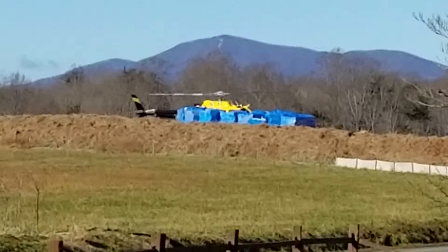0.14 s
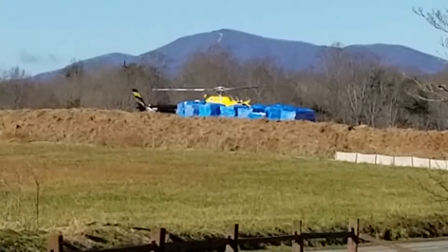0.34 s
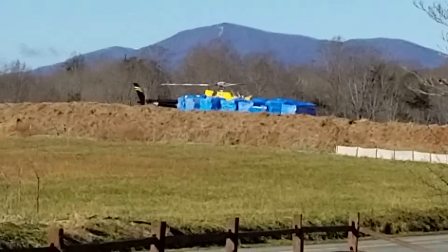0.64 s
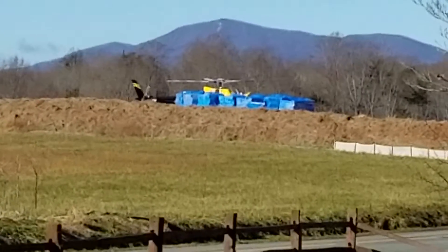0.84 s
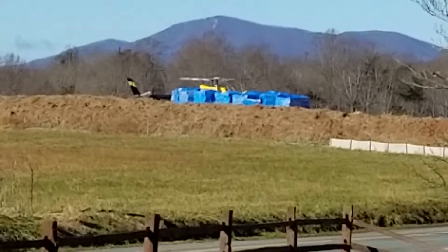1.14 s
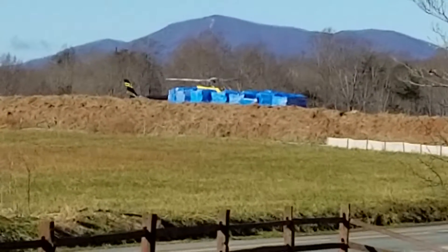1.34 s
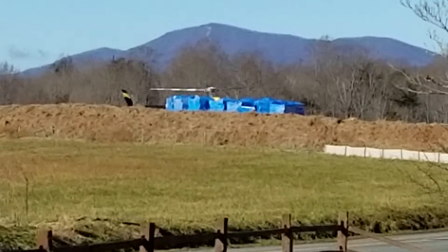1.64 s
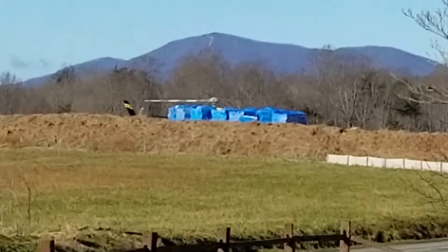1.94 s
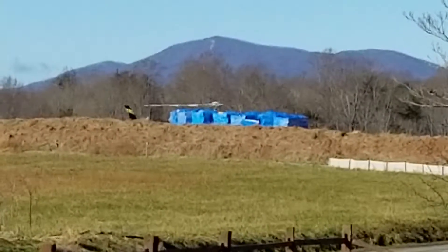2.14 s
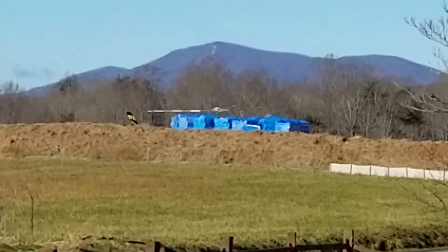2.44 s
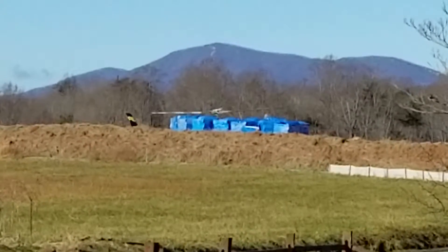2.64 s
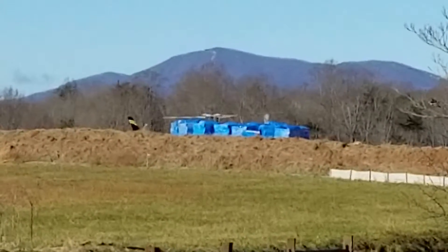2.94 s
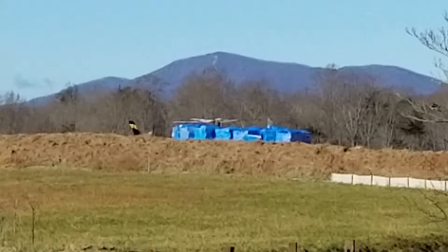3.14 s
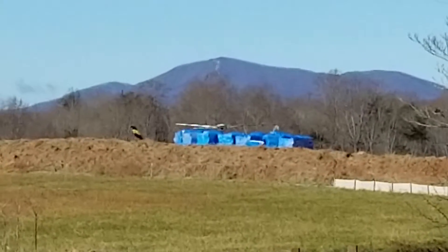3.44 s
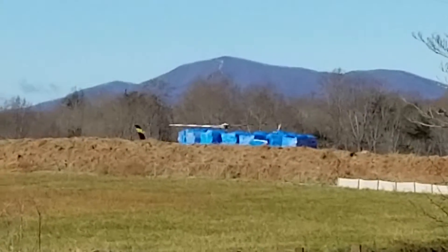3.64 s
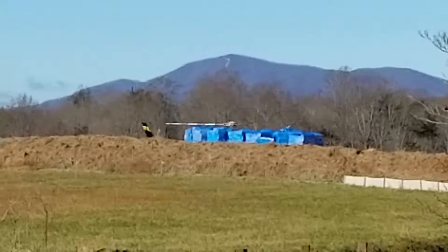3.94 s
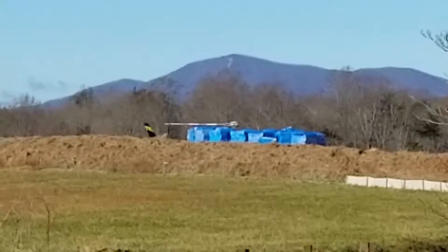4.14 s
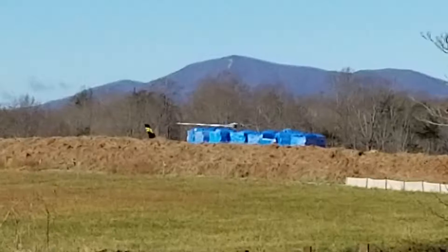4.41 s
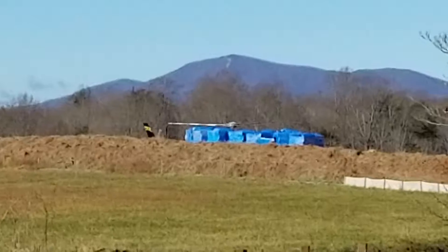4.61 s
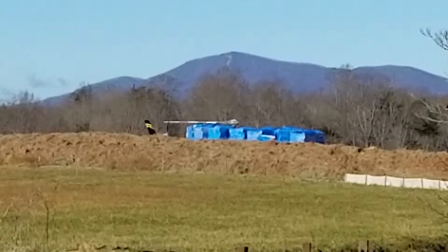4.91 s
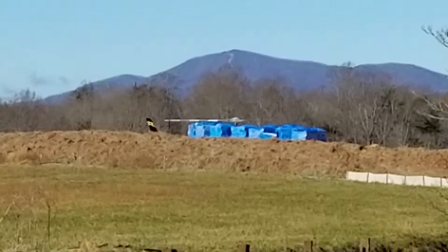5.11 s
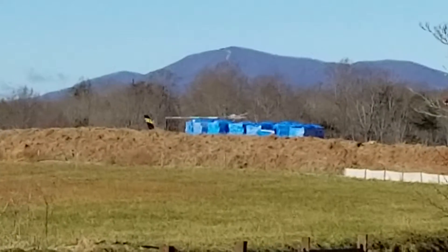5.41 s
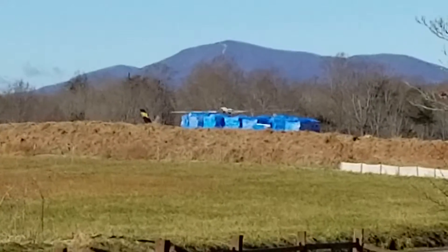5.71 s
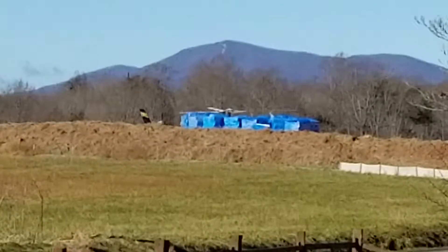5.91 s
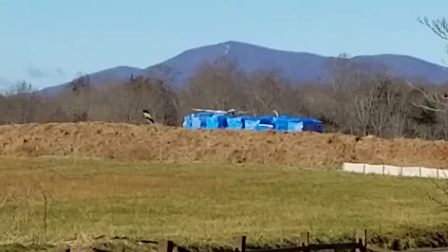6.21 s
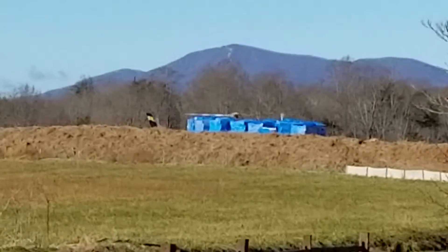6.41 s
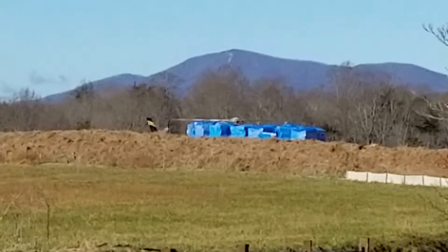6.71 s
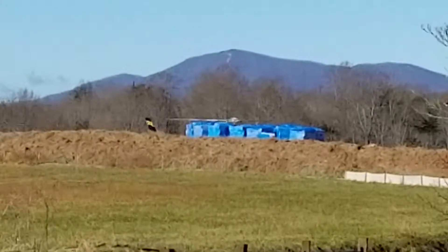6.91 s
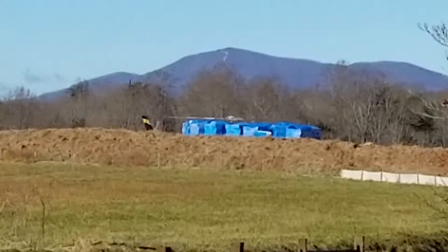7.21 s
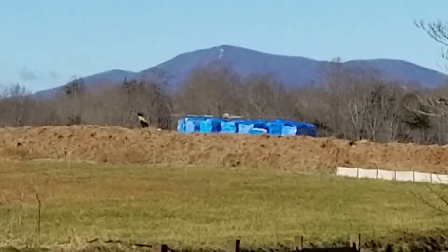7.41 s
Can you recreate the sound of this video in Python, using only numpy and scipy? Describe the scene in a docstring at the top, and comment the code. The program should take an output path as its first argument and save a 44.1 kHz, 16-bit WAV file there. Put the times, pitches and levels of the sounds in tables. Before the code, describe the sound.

Outdoors across a grassy field, a light helicopter behind an earth bank beats about nineteen times a second, with grainy slaps, swishing blades, a muffled turbine roar and faint tail rotor hum. Nearer and louder, gusty wind buffets the phone microphone in low thuds and fluttering rumbles, nearly continuous early, easing around five seconds, then surging again.

```python
"""Gusty wind buffets a phone microphone, a little more on the left: band-passed noise under a breeze and short gusts.
Far across a field, behind an earth bank, a light three-blade helicopter beats through it.
Each blade slaps up to three tip vortices, as short grainy noise puffs, and swishes as it swings round.
Turbine roar (flickering noise bands), rotor thump and tail rotor hum (wavering sines) lie under the slaps."""
import sys
import numpy as np
from scipy import signal
from scipy.fft import rfft, irfft
from scipy.io import wavfile
from scipy.ndimage import uniform_filter1d

SR = 44100
rng = np.random.default_rng(int(sys.argv[2]) if len(sys.argv) > 2 else 0)


def output_pcm(signal):
    """Save a mono or channel-first signal as 16-bit PCM at the path in sys.argv[1].

    Samples are clipped to [-1, 1] before scaling.
    """
    pcm = np.clip(np.atleast_2d(signal).T, -1, 1) * 32767
    wavfile.write(sys.argv[1], SR, np.round(pcm).astype(np.int16))


N = 333396
BLADE_HZ = 19.45  # blade passes per second
SIDES = np.array([[1], [-1]])  # left, right


def undb(db):
    """Gain of a level in dB."""
    return 10 ** (np.asarray(db) / 20)


def unit(x):
    """Scaled to rms 1."""
    return x / np.sqrt(np.mean(x ** 2))


def curves(table):
    """Columns of a table, interpolated to one value per sample."""
    s, *columns = np.transpose(table)
    return [np.interp(np.arange(N) / SR, s, c) for c in columns]


def butter(x, hz, kind, order):
    """Fixed high-, low- or band-pass."""
    return signal.sosfilt(signal.butter(order, hz, kind, fs=SR, output="sos"), x)


def walk(rate_per_s):
    """Random levels held 1 / rate s and slewed twice; rms 1."""
    hold = int(SR / rate_per_s)
    steps = np.repeat(rng.standard_normal(N // hold + 1), hold)
    slewed = uniform_filter1d(uniform_filter1d(steps, hold), hold)
    return unit(slewed[:N])


# Breeze between gusts. Each row: time [s], mean buffet level [dB], thud level below about 100 Hz without gusts [dB].
BREEZE = [(0, -25.5, -26.5), (.45, -22.5, -28.5), (.85, -28, -25), (1.3, -19, -26), (1.9, -25, -24),
          (2.2, -32.5, -29), (2.55, -14.5, -23.5), (2.75, -22.5, -23.5), (3.2, -18.5, -25), (3.7, -28, -27),
          (4.0, -20.5, -23), (4.5, -26.5, -29.5), (4.75, -26, -25), (5.1, -31.5, -31.5), (5.4, -24.5, -25),
          (5.6, -31.5, -26.5), (6.35, -14, -17.5), (6.6, -23, -29), (6.78, -13.5, -23.5), (6.84, -28, -34),
          (7.0, -21, -25), (7.3, -28, -28.5), (7.56, -31, -30.5)]
# Gusts added in power. Each row: middle [s], peak [dB], width at 1/e power [ms], rasp minus peak [dB].
GUSTS = [(0.173, -18.5, 106, -8.5), (0.28, -13.5, 46, -8), (0.353, -14.5, 45, -11.5),
         (0.562, -12, 71, -11.5), (0.786, -19.5, 35, -9), (0.993, -18.5, 36, -17.3),
         (1.102, -22.5, 114, -7.2), (1.237, -15, 62, -11.4), (1.327, -17, 79, -8), (1.476, -14, 32, -8),
         (1.527, -14, 19, -12.0), (1.647, -14, 38, -17), (1.726, -11, 24, -7), (1.808, -18.4, 26, -8.5),
         (1.855, -13.5, 36, -13), (2.514, -18.5, 38, -10), (2.637, -8.5, 19, -10.0), (2.823, -16.5, 42, -7),
         (2.917, -14.6, 54, -7.5), (3.1, -15.5, 30, -10), (3.158, -21, 15, -17.4), (3.287, -12.5, 38, -10),
         (3.366, -13.5, 110, -11), (3.495, -10, 64, -6), (3.627, -20, 45, -17), (3.789, -16, 22, -24),
         (3.88, -19, 78, -7.5), (4.05, -15, 120, -7.5), (4.128, -12.5, 29, -10), (4.306, -16, 44, -9.5),
         (4.685, -21, 62, -6.5), (5.698, -17, 34, -20), (5.891, -21, 28, -23), (6.033, -11.5, 30, -12.5),
         (6.149, -14.5, 24, -9), (6.249, -13.5, 68, -12), (6.317, -11, 26, -13.5), (6.374, -12, 24, -7),
         (6.717, -10, 65, -10), (6.891, -14.5, 63, -8), (6.952, -13, 58, -5), (7.086, -16.5, 48, -10.9)]


def gusts(breeze_rasp_db=-9.5, rasp_growth_db_per_db=0.15, middling_wind_db=-20.5,
          wander_db=1.8, wander_per_s=30, thud_follows=0.45):
    """Gains of thud, buffet and rasp: wandering breeze plus a bell-shaped swell per gust; thud takes a share."""
    ms = np.arange(int(N / SR * 1000) + 2)
    middle_s, peak_db, length_ms, gust_rasp_db = np.transpose(GUSTS)[:, :, None]
    swell_power = undb(peak_db) ** 2 * np.exp(-(2 * (ms - 1000 * middle_s) / length_ms) ** 2)

    def summed(power):
        """Total power of all gusts, from 1 ms steps to samples."""
        return np.interp(np.arange(N) / SR * 1000, ms, power.sum(axis=0))

    breeze_db, thud_db = curves(BREEZE)
    breeze_power = undb(breeze_db + wander_db * walk(wander_per_s)) ** 2
    buffet = np.sqrt(breeze_power + summed(swell_power))
    # rasp grows faster than the breeze
    rasp_db = breeze_rasp_db + rasp_growth_db_per_db * (breeze_db - middling_wind_db)
    rasp_power = breeze_power * undb(rasp_db) ** 2 + summed(swell_power * undb(gust_rasp_db) ** 2)
    thud = undb(thud_db) * (buffet / undb(breeze_db)) ** thud_follows
    return thud, buffet, np.sqrt(rasp_power)


def wind(left_db=0.65, apart_db=-26, flutter_db=2.5, flutter_per_s=55):
    """Eddies thump on the port: thud, low fluttering buffet, and a rasp that shares the flutter."""
    thud_gain, buffet_gain, rasp_gain = gusts()
    pressures = []
    for _ in range(2):  # shared pressure, then the small part that differs between the sides
        flutter = flutter_db * walk(flutter_per_s)
        air = rng.standard_normal((3, N))
        thud = butter(butter(air[0], 110, "low", order=3), 60, "high", order=3)
        buffet = butter(butter(air[1], 229.4, "low", order=4), 84.8, "high", order=3)
        rasp = butter(air[2], 250, "low", order=2)
        rasp = butter(butter(rasp, 1100, "low", order=3), 290, "high", order=3)
        pressures.append(thud_gain * unit(thud)
                         + buffet_gain * unit(buffet * undb(flutter))
                         + rasp_gain * unit(rasp * undb(0.81 * flutter)))
    shared, apart = pressures
    return undb(left_db * SIDES) * shared + undb(apart_db) * SIDES * apart


# Third beat of the main rotor, tail blades, their octave. Each row: frequency [Hz], level before waver [dB rms].
HUM = [(58.4, -40.5), (69.3, -42), (138.6, -32.5)]


def hum(waver_db=2, waver_rad=.8):
    """Steady rotor tones, wavering in level and phase with the air they cross."""
    t = np.arange(N) / SR
    total = 0
    for hz, db in HUM:
        tone = np.sin(2 * np.pi * hz * t + waver_rad * walk(4))
        total = total + undb(db) * np.sqrt(2) * undb(waver_db * walk(5)) * tone
    return total


# Colour after bank and field, notched by the ground bounce. Each row: frequency [Hz], relative density [dB per Hz].
PATH = [(210, -45.5), (440, -10.5), (620, 0), (800, -8), (950, 0.5), (1090, -4), (1290, -18.5), (1750, -10),
        (2150, -10.5), (2350, -21.5), (2950, -31.5), (4050, -27), (5700, -43.5), (7300, -43), (9000, -62.5)]


def over_field(x):
    """Minimum-phase filter with the colour of the path, built by folding the cepstrum."""
    hz, db = np.transpose(PATH)
    log_hz = np.log(np.arange(1025) * SR / 2048 + 1)
    log_gain = np.interp(log_hz, np.log(hz), db) * np.log(10) / 20
    cepstrum = irfft(log_gain)
    cepstrum[1:1024] *= 2
    cepstrum[1025:] = 0
    impulse = irfft(np.exp(rfft(cepstrum)))
    return signal.fftconvolve(x, impulse)[:N]


# Broad hiss of the advancing blade. Each row: time [s], loudest moment after the blade mark [ms].
SWISH = [(0, 34.6), (2, 26), (4, 15), (6, 3), (7.56, 1.3)]
# Turbine and rotor wash. Each row: time [s], roar before trim [dB], treble minus roar [dB],
# filling of the ground notches near 1.4 kHz [dB] and near 2.7 kHz [dB].
ROAR = [(0, -32.5, -13.5, 7.5, 4), (.6, -26, -16.5, 7.5, 5), (1.1, -29, -16, 5.5, 4.5),
        (1.5, -30.5, -15.5, 4.5, 3.5), (2, -31, -16, 0.5, 4.5), (2.6, -28.5, -15.5, 7, 3.5),
        (3.5, -27, -16.5, 6, 2.5), (3.9, -31, -14, 4, 6.5), (4.3, -30, -16.5, -0.5, 0.5),
        (5, -31.5, -16, 2, -0.5), (6, -27.5, -15, 2, 1), (6.8, -31.5, -18, 1.5, 5.5),
        (7.56, -32.5, -14.5, -5.5, 1.5)]


def wash(swish_db=2.0, bright_swish_db=2.5, top_swish_db=1.0, split_hz=3000, flicker_db=1.25, trim_db=-2.5):
    """Turbulent roar in half-octave bands that flicker and swell once for every blade."""
    roar_db, treble_db = curves(ROAR)[:2]
    turn = BLADE_HZ * (np.arange(N) / SR - curves(SWISH)[0] / 1000)
    swell = np.cos(2 * np.pi * turn) * (1 + 0.47 * walk(3.4))
    edges_hz = 250 * 2 ** np.arange(0, 5.5, .5)
    bands = 0
    for pair in zip(edges_hz, edges_hz[1:]):
        band = butter(rng.standard_normal(N), pair, "band", order=2)
        bands = bands + band * undb(flicker_db * walk(5))
    air = over_field(bands)
    body = unit(butter(air, split_hz, "low", order=4)) * undb(swish_db * swell)
    top = unit(butter(air, split_hz, "high", order=4)) * undb(treble_db + bright_swish_db * swell)
    # extra swing above 4.8 kHz
    top = top + (undb(top_swish_db * swell) - 1) * butter(top, 4800, "high", order=4)
    return undb(roar_db + trim_db) * (body + top)


# One table per vortex the blades cut; the moment slips as the craft turns.
# Each row: time [s], arrival after the blade mark [ms], mean chop level below 1.3 kHz [dB],
# snap up to 2.9 kHz minus chop [dB], crack above minus chop [dB].
VORTICES = [
    [(0, 33, -41, 4, -5.5), (.5, 30, -36.5, -3.5, -12.5), (1.0, 25.5, -31, -2.5, -18),
     (1.6, 23, -36.5, -7.5, -14.5), (2.2, 20.5, -30.5, -5, -14), (2.8, 18, -35, -4.5, -14),
     (3.4, 20.5, -26.5, -12.5, -18.5), (4.0, 20.5, -39, -10.5, -13), (4.6, 21.5, -36.5, -8, -16),
     (5.5, 18, -41, -3, -15.5), (6.2, 17, -55, -5, -12.5)],
    [(2.8, 15, -55, -12, -16), (3.3, 14, -31, -3.5, -24), (3.6, 14, -31.5, -0.5, -14.5),
     (4.2, 10, -36, -4, -13.5), (5, 7.4, -42, -2, -20.5), (5.9, 4.46, -38.5, -3.5, -12.5),
     (6.4, 3.93, -34.5, -2.5, -15.5), (7.0, 3.5, -41.5, -1, -11.5), (7.56, 5, -33, -11, -23)],
    [(3.2, 6, -59, -7, -11), (3.7, 3, -35, -1, -9), (4.5, 0, -42, -9, -17), (5.3, -5, -33.5, -3, -20.5),
     (5.7, -5, -32, -4, -21.5), (6.1, -5.5, -29, -10, -23), (6.7, -6.5, -33, -1, -18),
     (7.2, -6, -34.5, 3, -11.5), (7.56, -4, -31, -3.5, -17.5)],
]
# Chop, snap, crack; treble is scattered into a longer puff. Each row: low edge [Hz], high edge [Hz], rise [ms], fade [ms].
VOICES = [(350, 1240, 1.2, 3.7), (1278, 2940, 1.9, 4.2), (2920, 5340, 2.8, 4.5)]


def slaps(vortex, jitter_ms=.5, lead_ms=3.8, alike=0.75, ragged_db=2.5, size_db=1.6,
          wander_db=1.27, wander_per_s=2.8):
    """Each cut tears a short grainy puff that resembles the one before, uneven in its three voices."""
    lag_ms, chop_db, snap_db, crack_db = curves(vortex)
    voices_db = [chop_db + db + wander_db * walk(wander_per_s) for db in (0, snap_db, crack_db)]
    marks_s = np.arange(int(N / SR * BLADE_HZ) + 1) / BLADE_HZ
    cuts = len(marks_s)
    mark_samples = np.minimum(marks_s * SR, N - 1).astype(int)
    # puffs start lead_ms before the arrival
    start_ms = lag_ms[mark_samples] + jitter_ms * rng.standard_normal(cuts) - lead_ms
    age_ms = np.arange(1000) / SR * 1000
    starts = np.maximum((marks_s + start_ms / 1000) * SR, 0).astype(int)
    at = starts[:, None] + np.arange(len(age_ms))
    # recursion from cut to cut makes neighbours alike
    grain = signal.lfilter([1], [1, -alike], rng.standard_normal(at.shape), axis=0)
    out = 0
    for (low_hz, high_hz, rise_ms, fade_ms), db in zip(VOICES, voices_db):
        envelope = (1 - np.exp(-age_ms / rise_ms)) ** 2 * np.exp(-age_ms / fade_ms)
        puffs = butter(grain * envelope, (low_hz, high_hz), "band", order=3)
        puffs *= undb(ragged_db * np.repeat(rng.standard_normal((cuts, 25)), 40, axis=1))  # 40-sample steps
        size = undb(size_db * rng.standard_normal((cuts, 1)))
        puffs *= size / np.sqrt(np.sum(puffs ** 2, axis=1, keepdims=True))
        train = np.bincount(at.ravel(), puffs.ravel(), N)[:N]
        out = out + undb(db) * unit(over_field(train))
    return out


def notches(x):
    """The ground bounce cancels less or more in two bands as the fill columns of ROAR vary."""
    low_db, high_db = curves(ROAR)[2:]
    low = butter(x, (1200, 1700), "band", order=2)
    high = butter(x, (2300, 3100), "band", order=2)
    return x + (undb(low_db) - 1) * low + (undb(high_db) - 1) * high


def scene():
    """Helicopter ahead, reaching the left port a trace later than the right, under the wind."""
    blades = sum(slaps(vortex) for vortex in VORTICES)
    craft = notches(blades + wash()) + hum()
    skew = 0.068 * np.gradient(craft)  # first-order delay of 0.068 sample
    return np.array([craft - skew, craft + skew]) + wind()


def record(dry, voice_stop_hz=8490, top_hz=15750, hiss_db=-75):
    """The phone clips peaks, keeps the band below about 8 kHz and adds its own hiss up to top_hz."""
    voice_filter = signal.cheby2(10, 30, voice_stop_hz, fs=SR, output="sos")
    band = signal.sosfilt(voice_filter, np.clip(dry, -1, 1))
    mid, apart = rng.standard_normal((2, N))
    hiss = undb(hiss_db) * (undb(.35 * SIDES) * mid + undb(-19) * SIDES * apart)
    top_filter = signal.ellip(10, .2, 70, top_hz, fs=SR, output="sos")
    return np.clip(signal.sosfilt(top_filter, band + hiss), -1, 1)


dry = scene()
out = record(dry)
output_pcm(out)
```